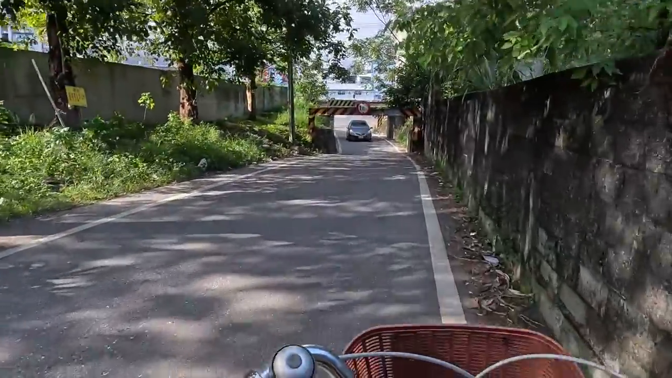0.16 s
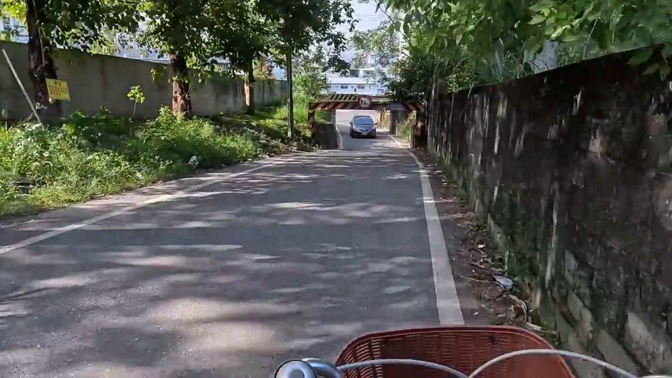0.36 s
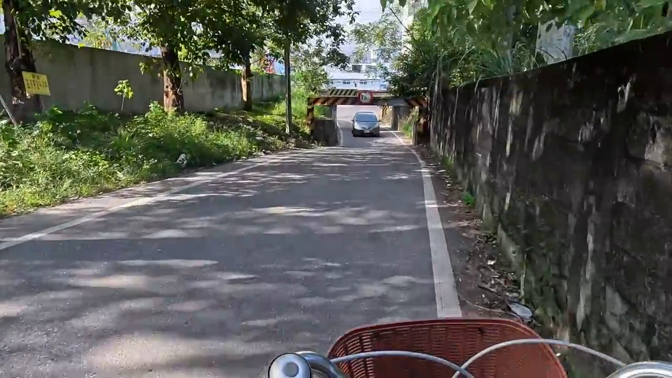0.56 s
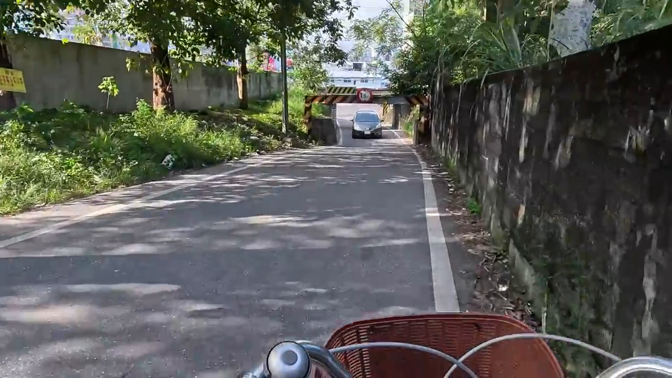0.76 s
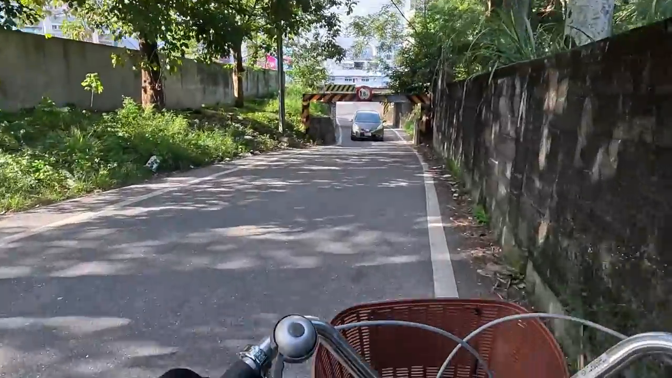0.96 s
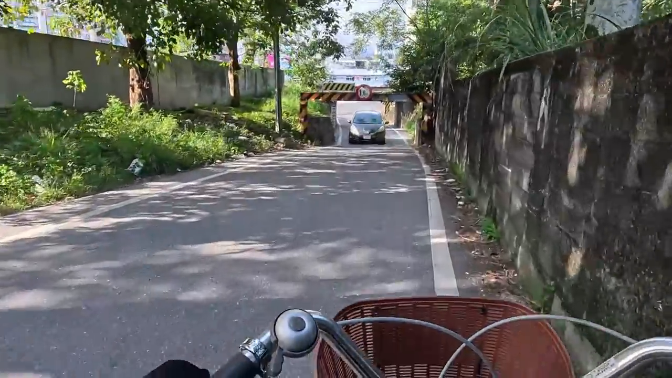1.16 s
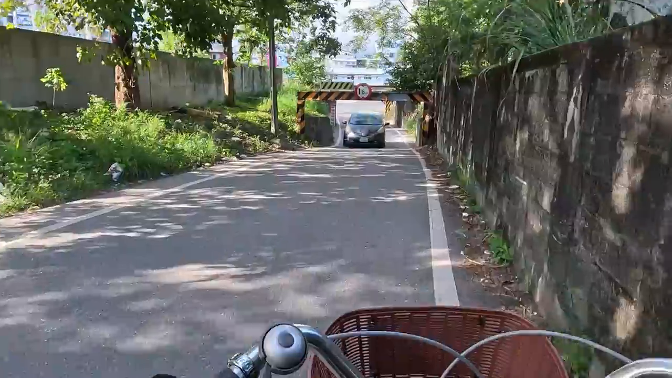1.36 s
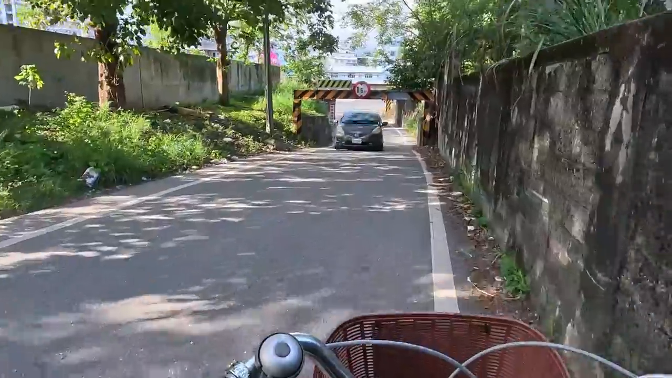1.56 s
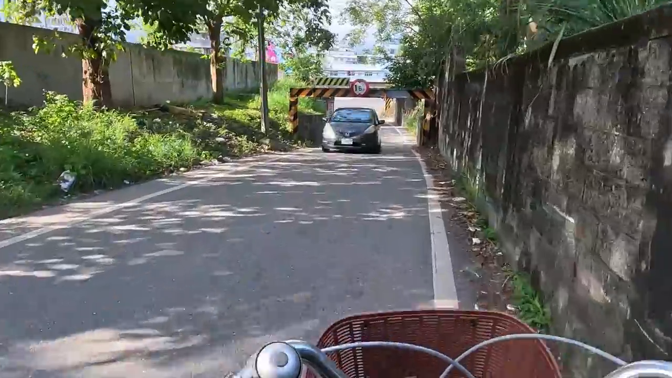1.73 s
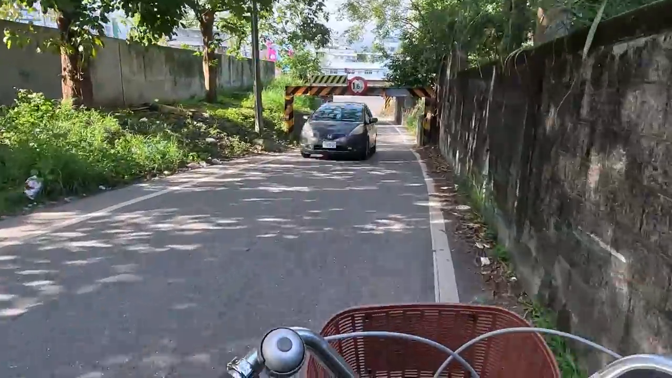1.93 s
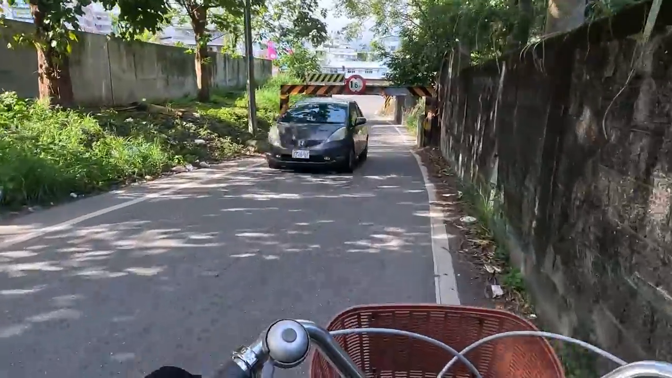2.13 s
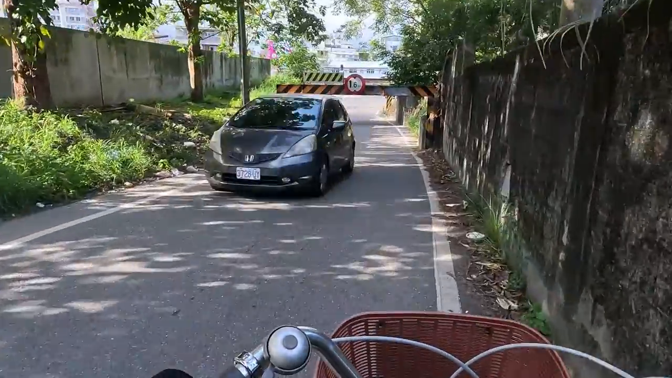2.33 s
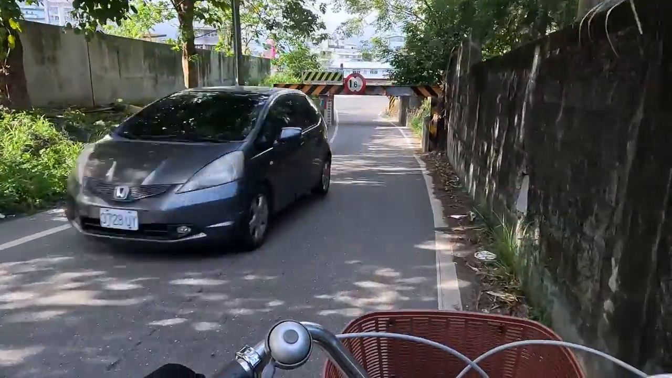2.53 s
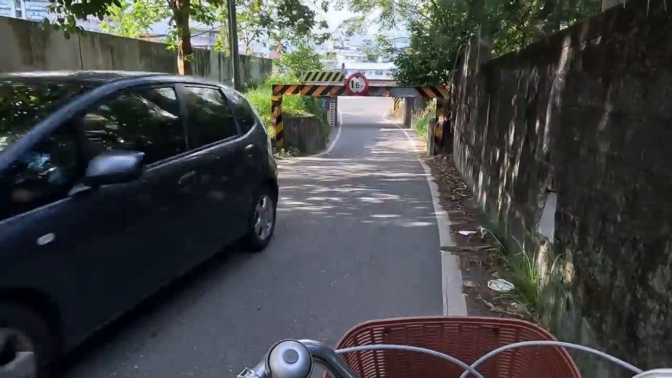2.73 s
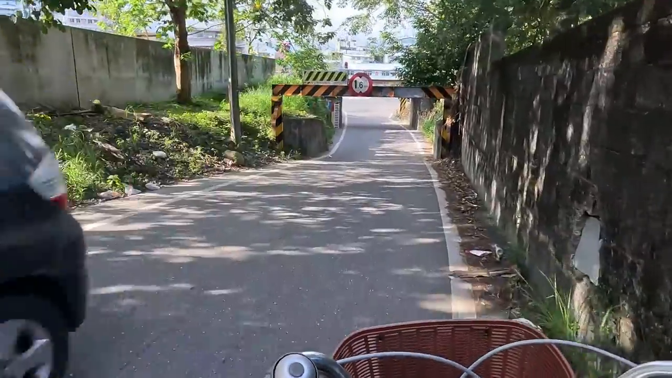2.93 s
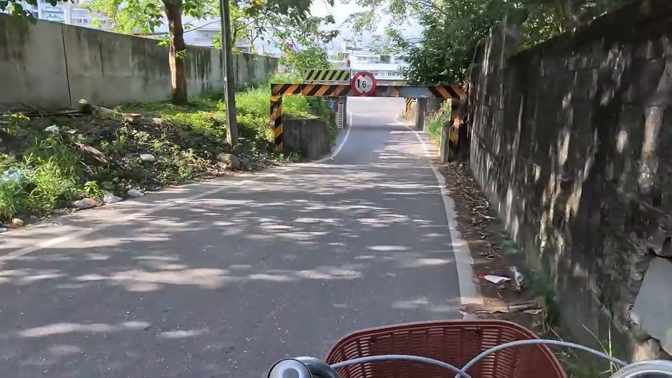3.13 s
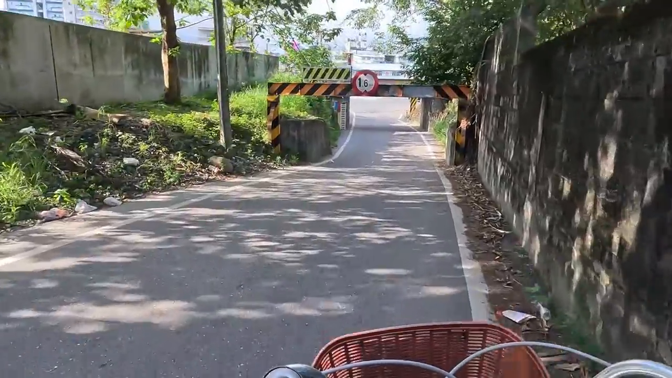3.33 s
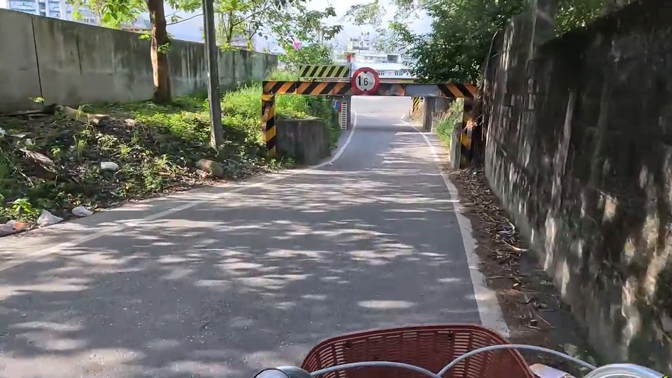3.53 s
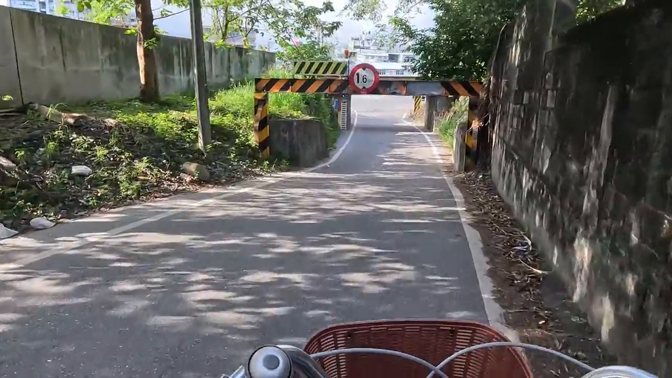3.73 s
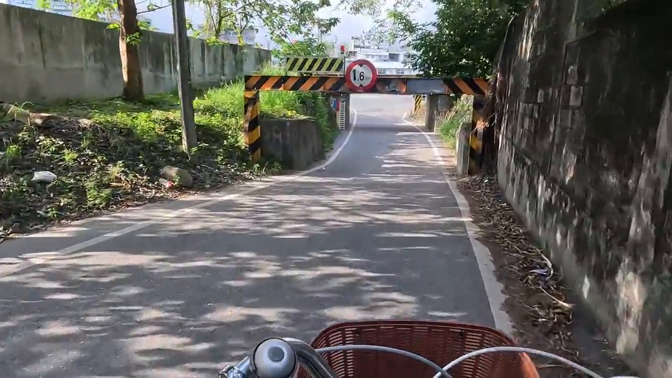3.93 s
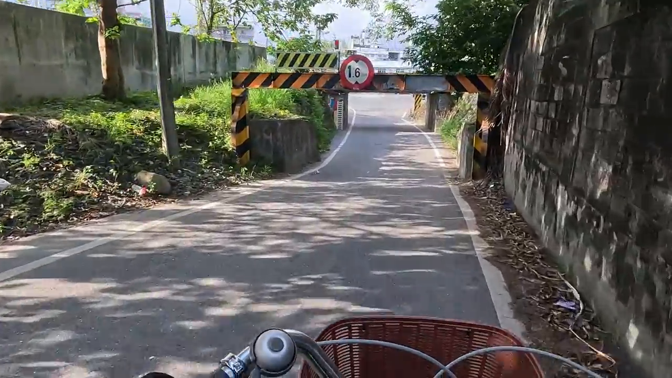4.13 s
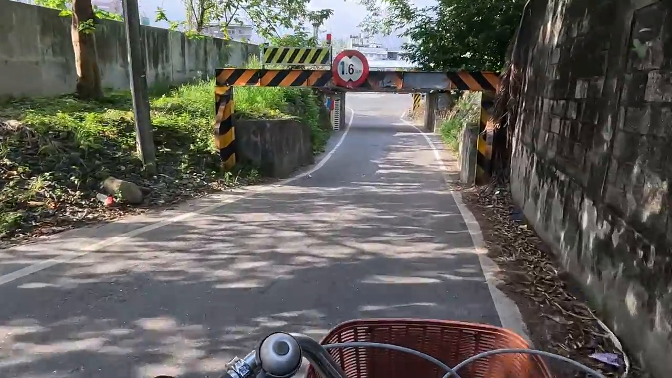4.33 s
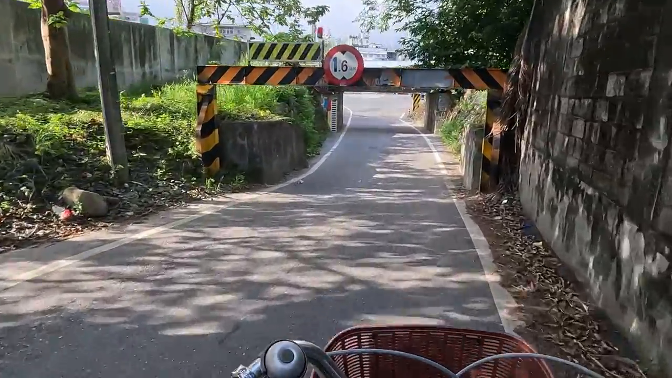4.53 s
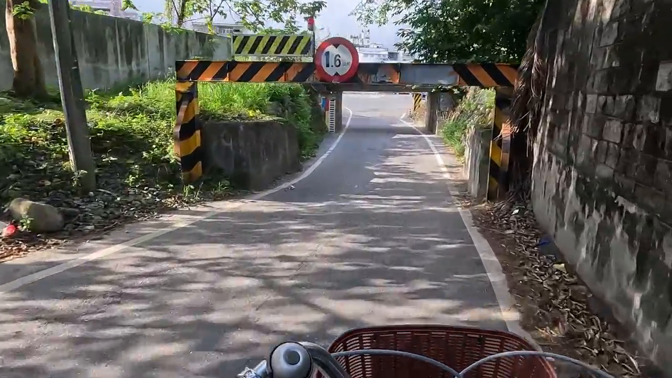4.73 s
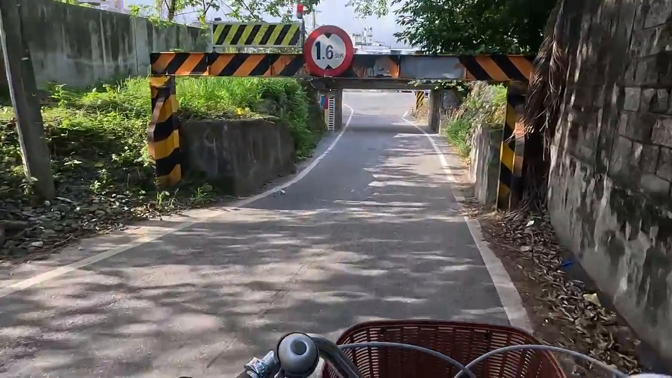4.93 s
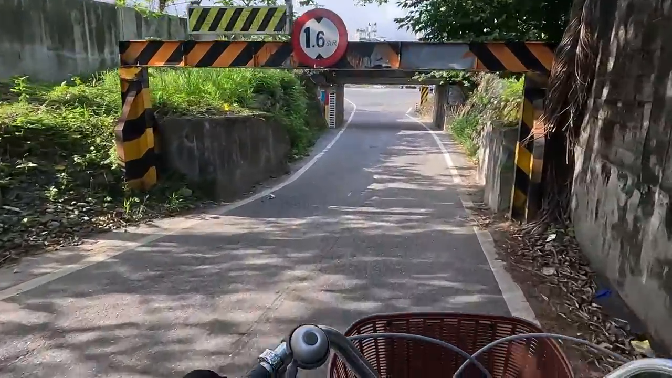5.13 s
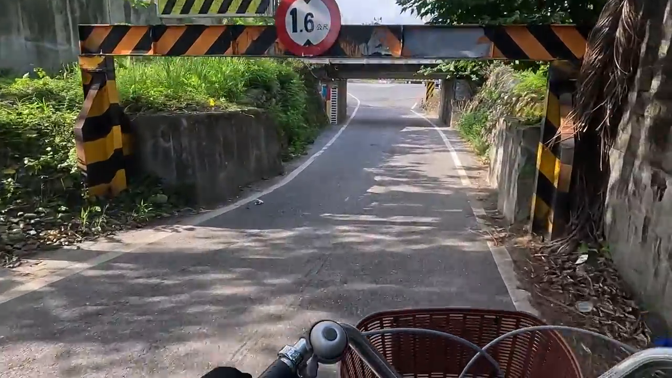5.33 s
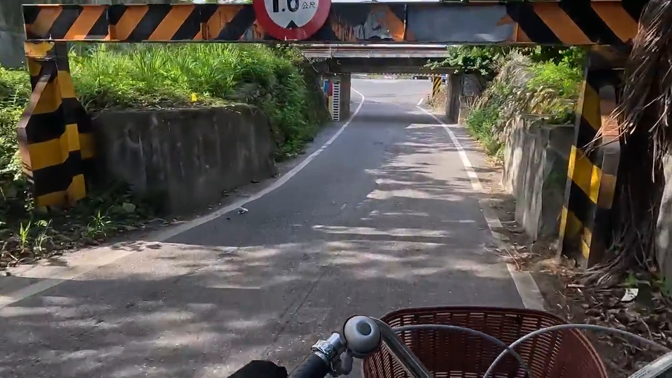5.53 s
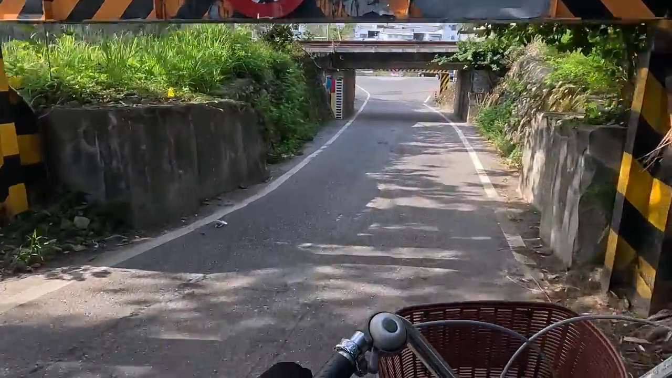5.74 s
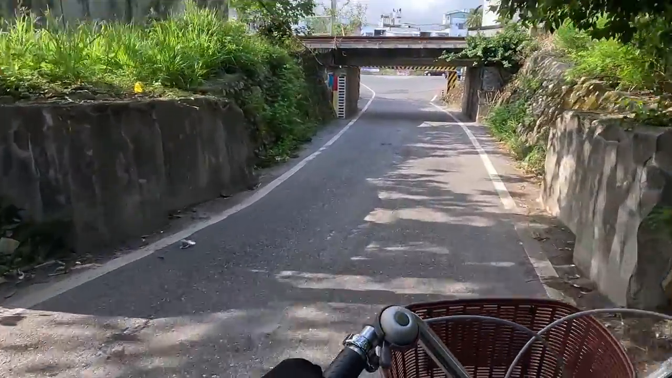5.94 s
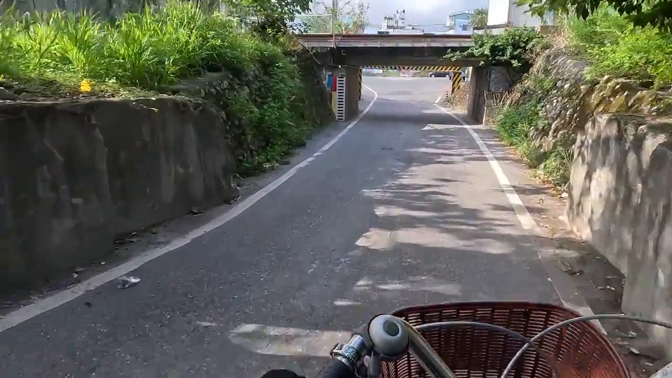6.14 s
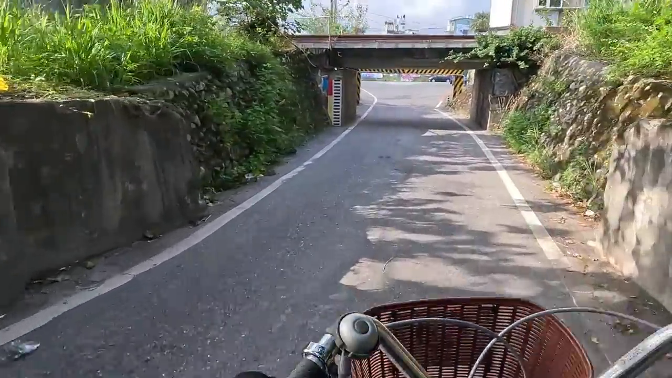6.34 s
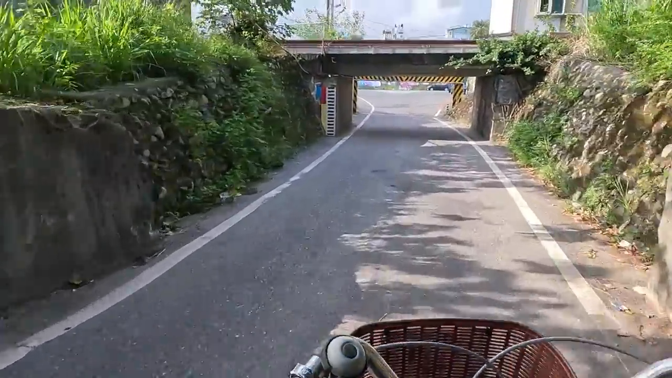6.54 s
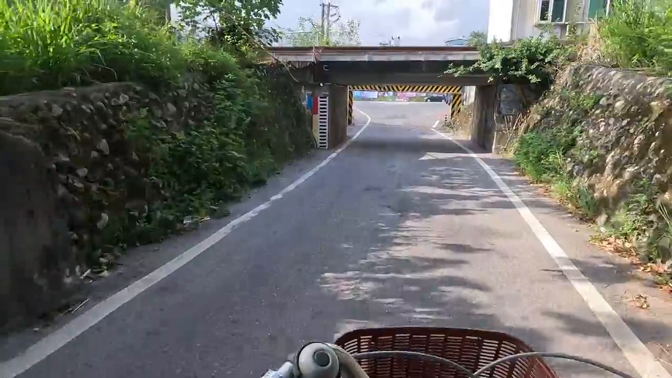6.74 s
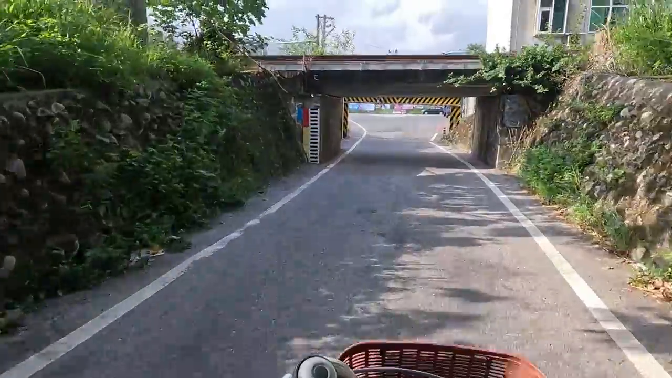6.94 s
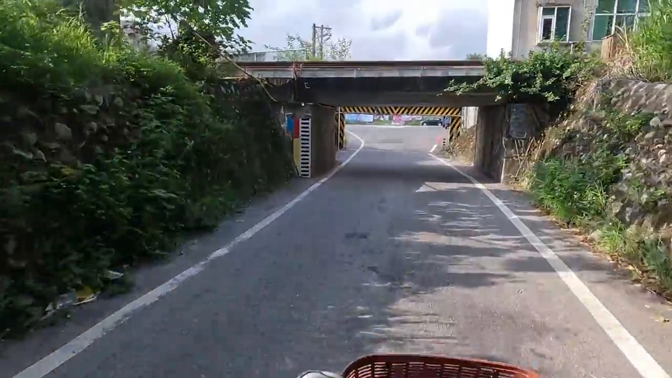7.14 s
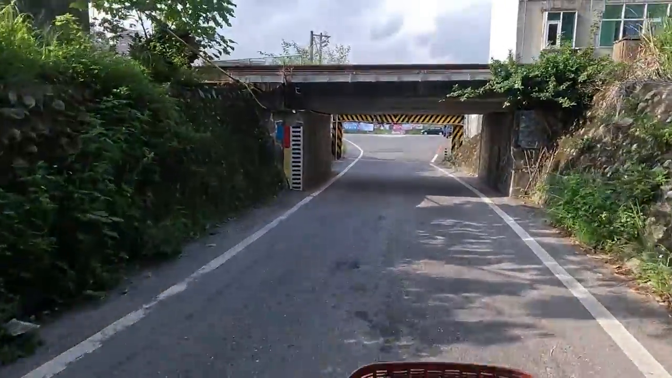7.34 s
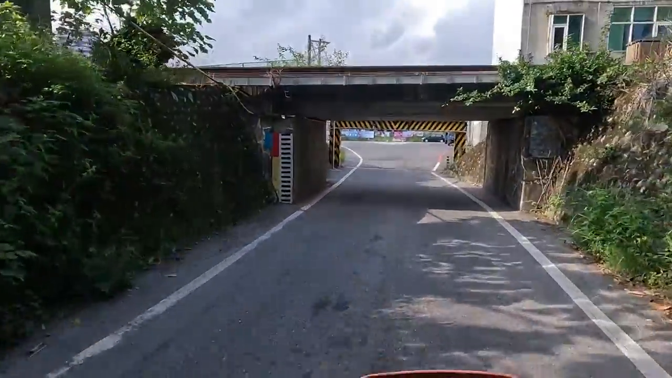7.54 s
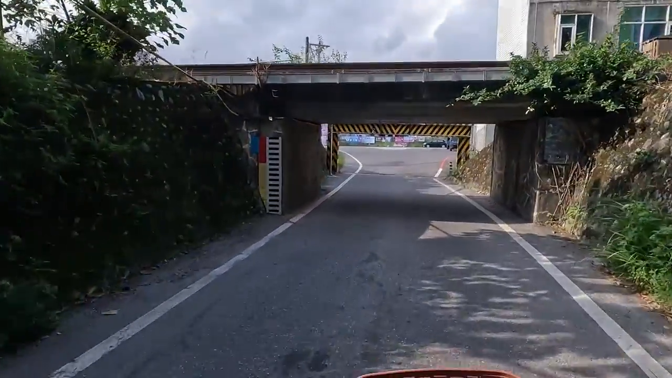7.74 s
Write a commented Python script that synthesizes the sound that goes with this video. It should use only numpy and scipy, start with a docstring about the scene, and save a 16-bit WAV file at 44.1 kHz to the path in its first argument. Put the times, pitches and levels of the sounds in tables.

```python
"""Tyre roar, rumble, wind and a distant engine's hum come first, at a bicycle rolling down a walled lane.
A microphone with two ports rides on the bicycle, towards an underpass; a small car passes close by.
Tyres, grit, wind and resonances are patchy noise in shaped bands; echoes off road and walls ripple some.
Exhaust, whine, tread note and hums are sums of wavering sines; the distant hum grows louder.
Freewheel clicks, litter crackles and knocks are short bursts, each with its own envelope."""
import sys
import numpy as np
from scipy import signal
from scipy.fft import rfft, irfft
from scipy.io import wavfile
from scipy.ndimage import uniform_filter1d

SR = 44100
rng = np.random.default_rng(int(sys.argv[2]) if len(sys.argv) > 2 else 0)


def pcm_store(signal):
    """Save signal as 16-bit PCM."""
    levels = np.round(np.clip(np.atleast_2d(signal), -1, 1) * 32767)
    wavfile.write(sys.argv[1], SR, levels.astype(np.int16).T)


N = 347933  # samples
TIME = np.arange(N) / SR  # seconds

# Reflection from the walls. Each row: time in seconds, delay in ms, strength as a share of the direct sound.
WALL_ECHO = [(3, 7.4, 0.03), (4, 6.9, 0.18), (5, 7.5, 0.18), (5.7, 8, 0.42), (6.35, 8.59, 0.29),
             (6.9, 10.15, 0.32), (7.89, 8.5, 0.33)]
# Reflection from the nearer wall. Each row: time in seconds, delay in ms, strength as a share.
NEAR_ECHO = [(3.9, 3.9, 0.17), (4.5, 4.25, 0.2), (5.1, 4.44, 0.34), (5.6, 5.3, 0.26), (5.85, 3.7, 0),
             (7.1, 4.7, 0), (7.5, 4.26, 0.33), (7.89, 4.6, 0.26)]


def gain_of(db):
    """Decibels to amplitude."""
    return 10 ** (np.asarray(db) / 20)


def evened(x):
    """Scales to rms 1."""
    return x / np.sqrt(np.mean(x ** 2) + 1e-20)


def read(points, hz):
    """Every column of a table over log frequency."""
    f, *columns = np.transpose(points)
    return [np.interp(np.log(hz + 1), np.log(f + 1), c) for c in columns]


def follow(rows, t):
    """Every column of a table over time."""
    s, *columns = np.transpose(rows)
    return [np.interp(t, s, c) for c in columns]


def level(rows):
    """Gain along a table of seconds and dB."""
    return gain_of(follow(rows, TIME)[0])


def together(*gains):
    """Unrelated sounds add by their power."""
    return np.sqrt(sum(g ** 2 for g in gains))


def swells(rows):
    """Gain of smooth swells, each with its own rise and fall."""
    gains = []
    for s, rise, fall, db in rows:
        width = np.where(TIME < s, rise, fall)
        gains.append(gain_of(db) * np.exp(-((TIME - s) / width) ** 2 / 2))
    return together(*gains)


def step(s, ramp_s):
    """Goes smoothly from 0 to 1 around time s."""
    return (1 + np.tanh((TIME - s) / ramp_s)) / 2


def present(rows):
    """Fades a source in and out over 1/20 s at the ends of its table."""
    return np.clip(np.minimum(TIME - rows[0][0], rows[-1][0] - TIME) * 20, 0, 1)


def drift(rate_hz):
    """Slow random wander of rms 1."""
    hz = np.fft.rfftfreq(N, 1 / SR)
    return evened(irfft(rfft(rng.standard_normal(N)) / (1 + (hz / rate_hz) ** 4), N))


def add(mix, s, sound):
    """Mixes a sound in at time s."""
    part = mix[round(s * SR):][:len(sound)]
    part += sound[:len(part)]


def wavering_phase(hz, waver, waver_hz):
    """Phase in radians of a pitch that wanders by the share waver (rms)."""
    return 2 * np.pi * np.cumsum(hz * (1 + waver * drift(rate_hz=waver_hz))) / SR


def tone(rows, waver, waver_hz):
    """A single wavering sine along a table of seconds, Hz and dB."""
    hz, db = follow(rows, TIME)
    return gain_of(db) * present(rows) * np.sin(wavering_phase(hz, waver, waver_hz))


def overtones(orders, phase):
    """Sum of sines at multiples of one phase, each starting anywhere in its cycle."""
    return sum(gain_of(db) * np.sin(round(k) * phase + 2 * np.pi * rng.random()) for k, db in orders)


def comb(echo, t, hz, fade_hz=1150):
    """Ripple that a moving reflection leaves in the spectrum; rough surfaces scatter the higher notes."""
    delay_ms, strength = follow(echo, t)
    back = strength[:, None] / (1 + (hz / fade_hz) ** 4)
    turn = np.exp(-2j * np.pi * np.outer(delay_ms, hz) / 1000)
    return abs(1 + back * turn) / np.sqrt(1 + back ** 2)


def rush(colour, gain, patchy_db, upper_gain=None, split_hz=None, echoes=(), doppler=None, size=1024):
    """Patchy turbulent noise at both ports; the part above split_hz may follow a gain of its own."""
    # The microphone's two ports. Each row: frequency in Hz, left minus right in dB, left lead in radians,
    # share unrelated between them in dB.
    ports = [(100, -0.5, 0.25, -19), (300, 1.2, 0.01, -18.5), (700, 3, 0.4, -18.5), (1150, 2, 0.49, -14),
             (1550, -1.5, 1, -10), (1900, 2.5, 0.74, -4), (2280, 1, -1.2, 0), (2670, 5.5, -2.5, -3),
             (3200, 10.5, -1, -11), (3570, 10, -2, -9), (4300, 5.5, 2, -2.5), (5100, 0, -0.57, -13.5),
             (8160, 0, 0, -19), (9730, 3, 1.5, -3)]
    hop = size // 4
    hz, t = np.fft.rfftfreq(size, 1 / SR), np.arange(N // hop + 5) * hop / SR
    in_band = (hz < 1.5 * colour[-1][0]) * (hz > colour[0][0] / 2)
    shape = gain_of(read(colour, hz)[0]) * in_band
    shape = shape / np.linalg.norm(shape)
    if doppler:
        shape = np.interp(hz / follow(doppler, t)[0][:, None], hz, shape)
    gain = np.interp(t, TIME, gain)[:, None]
    if split_hz:
        lower = 1 / (1 + (hz / split_hz) ** 10)
        # each part is scaled so that its own gain sets its power
        low, high = (np.sqrt(part / (part @ shape ** 2)) for part in (lower, 1 - lower))
        gain = together(gain * low, np.interp(t, TIME, upper_gain)[:, None] * high)
    for echo in echoes:
        shape = shape * comb(echo, t, hz)

    a, b, c, d, patches = rng.standard_normal((len(t), len(hz), 5)).T.swapaxes(1, 2)
    shared, unrelated = a + 1j * b, c + 1j * d
    patches = uniform_filter1d(patches, size=6, axis=0)
    patches = evened(uniform_filter1d(patches, size=12, axis=1))

    # the right port hears a shifted, partly unrelated copy; their middle keeps the level
    balance_db, lead, apart_db = read(ports, hz)
    same = np.sqrt(1 - np.minimum(gain_of(apart_db), 1) ** 2)
    left, right = gain_of(balance_db / 2), gain_of(-balance_db / 2)
    centre = np.sqrt(left ** 2 + right ** 2 + 2 * same * np.cos(lead)) / 2
    other = (same * shared + np.sqrt(1 - same ** 2) * unrelated) * np.exp(-1j * lead)
    frames = np.array([left * shared, right * other]) / centre
    frames = frames * shape * gain * gain_of(patchy_db * patches)
    sound = signal.istft(frames.swapaxes(1, 2), nperseg=size, noverlap=size - hop)[1][:, :N]
    return sound * np.sqrt(3 / 2)  # makes up for the power lost as unrelated frames overlap


def pass_by(nearest_s, peak_db, spread, behind_db_per_s):
    """Gain of the passing car: it falls with distance to the power spread, and faster once the car is behind."""
    closing_m_per_s, gap_m = 8.3, 2.36  # car and bicycle together; their distance as they meet
    distance = np.hypot(closing_m_per_s * (TIME - nearest_s), gap_m)
    behind_db = behind_db_per_s * np.maximum(TIME - nearest_s, 0)
    return gain_of(peak_db - behind_db) * (gap_m / distance) ** spread


def lane(steady_db, swell_db):
    """Gain of the road noise that fills the lane with or without the car."""
    # Swells of the road noise. Each row: peak in seconds, rise and fall in seconds, level in dB above swell_db.
    road_swells = [(5.11, 0.25, 0.11, -0.5), (6.36, 0.26, 0.2, 0.5), (6.62, 0.12, 0.056, -2)]
    return together(gain_of(steady_db), gain_of(swell_db) * swells(road_swells))


def tread_roar():
    """The roar of tread blocks on asphalt, from the car until it is gone and from the traffic beyond."""
    # Roar of the traffic beyond, then the car's narrower one. Each row: Hz, relative density in dB per Hz.
    roar_colour = [(780, -27), (850, -17), (900, -5), (980, -3), (1060, -3), (1160, 0), (1250, -2.5),
                   (1370, -7.5), (1490, -25), (1700, -43)]
    car_colour = [(780, -25), (860, -14.5), (920, -6.5), (990, -3), (1060, -2.5), (1160, 1), (1240, -1.5),
                  (1340, -4), (1430, -11.5), (1520, -25.5), (1700, -38)]
    # Pitch of the car's roar, sharp at first and then either side of true. Each row: seconds, pitch factor.
    pitch_shift = [(0, 1.073), (1.2, 1.014), (2.4, 0.99), (2.85, 1.012), (3.1, 0.97), (4.5, 1.03)]
    # The car's roar, beamed ahead of its tyres. Each row: seconds, level in dB before the closing fade.
    car_roar = [(0, -37), (.6, -30.5), (1.15, -35), (1.47, -31), (1.62, -26), (2.25, -23), (2.42, -24),
                (2.62, -22), (3.12, -25), (3.3, -29.5), (3.6, -34.5), (4.4, -36)]
    car_gain = level(car_roar) * (1 - step(car_roar[-1][0], ramp_s=0.23))
    car = rush(car_colour, car_gain, patchy_db=0.55, doppler=pitch_shift, size=2048)
    lane_gain = lane(steady_db=-35, swell_db=-31.5)
    beyond = rush(roar_colour, lane_gain, patchy_db=0.5, echoes=(WALL_ECHO, NEAR_ECHO), size=2048)
    return car + beyond


def tread_hiss():
    """Air hissing out of the treads, loudest as the car goes by and brighter towards the underpass."""
    # Spectrum of the hiss. Each row: frequency in Hz, relative density in dB per Hz.
    hiss_colour = [(1350, -6), (1520, -2.5), (1700, 0.5), (1950, 2), (2100, -2.5), (2450, -18), (2850, -8),
                   (3200, -9), (3550, -17.5), (3950, -18.5), (4500, -28.5), (5200, -40)]
    # A brief swell of the lower hiss at the height barrier, then swells of the upper hiss near the underpass.
    # Each row: peak in seconds, rise and fall in seconds, level in dB.
    barrier_hiss = [(5.12, 0.05, 0.082, -45.5)]
    upper_hiss = [(6.78, .08, 0.074, -52.5), (7.18, 0.088, .05, -49), (7.85, .17, .2, -53)]
    near = step(6.25, ramp_s=0.45)  # the underpass comes near
    low = together(pass_by(nearest_s=2.93, peak_db=-35.5, spread=0.99, behind_db_per_s=11.0),
                   lane(steady_db=-51.0 + 2.8 * near, swell_db=-52.5),
                   swells(barrier_hiss))
    high = together(pass_by(nearest_s=2.85, peak_db=-44.0, spread=0.81, behind_db_per_s=6.0),
                    lane(steady_db=-56.0 + 5.1 * near, swell_db=-67.0),
                    swells(upper_hiss))
    return rush(hiss_colour, low, patchy_db=1.14, upper_gain=high, split_hz=2520)


def tread_note():
    """The rough note of the tread blocks striking the road, a little to the left."""
    # The note within the roar, clearest just after the car has passed.
    # Each row: seconds, pitch in Hz before its waver, level in dB before flutter and balance.
    note_path = [(0, 1165, -39), (.6, 1198, -33.5), (1.05, 1135, -44), (1.2, 1130, -31), (1.42, 1118, -35),
                 (1.65, 1157, -32), (2.25, 1175, -28.5), (2.83, 1179, -26), (3.02, 1265, -26),
                 (3.11, 1203, -21), (3.17, 1195, -34), (3.4, 1185, -32.5), (3.55, 1175, -49)]
    flutter = 1 + 0.4 * drift(rate_hz=55)
    balance = gain_of([[1], [-1]])  # dB, left and right
    return tone(note_path, waver=0.01102, waver_hz=40.3) * flutter * balance


def opening():
    """Gain of the rumble, which starts 4.5 dB down and comes up quickly."""
    return gain_of(-4.5 * np.exp(-(TIME / 0.18) ** 2))


def road_rumble():
    """The low body of the tyre noise, carried far by the walls and rippled by their echoes."""
    # Spectrum of the rumble. Each row: frequency in Hz, relative density in dB per Hz.
    rumble_colour = [(110, -11), (155, -2.5), (205, 0), (245, 0), (305, 1.9), (400, -1), (455, -4.5),
                     (530, -3), (660, -4), (750, -6), (840, -9), (1000, -21)]
    # The road's reflection of the car, latest soon after they meet. Each row: seconds, delay in ms, strength.
    ground_echo = [(0, 0.79, 0.5), (1, 0.57, 0.23), (1.8, 0.55, 0.16), (2.2, 0.97, 0.33), (2.5, 1.37, 0.28),
                   (2.72, 2.75, 0.093), (3.1, 3.6, 0.15), (3.5, 2.4, 0.045)]
    # Low swell as the car comes through the narrow cutting.
    # Each row: peak in seconds, rise and fall in seconds, level in dB.
    car_in_cutting = [(1.7, 0.43, 0.75, -34)]
    walled = step(5.6, ramp_s=0.12)  # the walls close in on the bicycle and hold the low road noise
    low = together(pass_by(nearest_s=3.02, peak_db=-31.5, spread=0.89, behind_db_per_s=15.5),
                   lane(steady_db=-38.5 + 3.5 * walled, swell_db=-34.5),
                   swells(car_in_cutting))
    high = together(pass_by(nearest_s=2.75, peak_db=-28, spread=0.58, behind_db_per_s=12.0),
                    lane(steady_db=-40.0 + 3.86 * walled, swell_db=-34.5))
    echoes = (ground_echo, WALL_ECHO, NEAR_ECHO)
    rumble = rush(rumble_colour, low, patchy_db=0.84, upper_gain=high, split_hz=430, echoes=echoes, size=4096)
    return rumble * opening()


def tyres():
    """Tread roar, hiss, note and road rumble; the coarse asphalt makes roar and hiss flutter."""
    flutter = gain_of(0.24 * drift(rate_hz=51))
    return (tread_roar() + tread_hiss()) * flutter + tread_note() + road_rumble()


def far_engine():
    """A slowly sagging hum; reflections in the lane make its fundamental dip and its octave swell."""
    # The distant engine's pitch. Each row: seconds, firing rate in Hz.
    hum_pitch = [(0, 134.8), (2, 133.9), (3.6, 132.3), (4.75, 132.7), (6, 130.4), (7.15, 128),
                 (7.89, 126.7)]
    # Its partials. Each row: multiple of the firing rate, level in dB relative to the hum level.
    hum_orders = [(1, -3), (3, -30)]
    # Its level before dips and partials. Each row: seconds, level in dB.
    hum_level = [(0, -36.5), (.8, -31.5), (1.5, -37.5), (2.05, -30), (2.7, -30.5), (3.55, -29),
                 (4.25, -27.5), (5.4, -22.5), (5.7, -24), (6.0, -15.5), (6.17, -20), (6.45, -18.5),
                 (6.7, -21.5), (7.2, -20), (7.89, -21.5)]
    # Where reflections cancel it. Each row: centre in seconds, half width in seconds, depth in dB.
    hum_dips = [(.12, .06, 9), (.53, 0.14, 13.5), (1.25, 0.046, 10), (1.72, 0.11, 17), (2.37, 0.12, 13),
                (3.15, 0.18, 18), (3.9, 0.13, 9.5), (4.49, 0.086, 8.5), (4.91, 0.036, 6), (5.16, 0.15, 15),
                (6.92, 0.053, 12), (7.35, 0.075, 5.5), (7.73, 0.061, 12)]
    # Swells of its octave. Each row: peak in seconds, rise and fall in seconds, level in dB.
    octave_swells = [(1.74, .14, 0.36, -36.5), (3.3, 0.11, 0.085, -35.5), (4.25, .2, .2, -44),
                     (5.03, 0.26, 0.224, -31), (7.54, 0.091, 0.052, -34)]
    hz, = follow(hum_pitch, TIME)
    phase = wavering_phase(hz, waver=0.0036, waver_hz=5.7)
    dips = gain_of(-sum(db * np.exp(-((TIME - s) / width) ** 2) for s, width, db in hum_dips))
    note = overtones(hum_orders, phase) * (1 + 0.066 * drift(rate_hz=6.4))
    octave = np.sin(2 * phase + 0.45 * drift(rate_hz=5.3)) * (1 + 0.33 * drift(rate_hz=31))
    between_swells = gain_of(-45.5 + 3.1 * drift(rate_hz=2.6))
    return level(hum_level) * dips * note + together(between_swells, swells(octave_swells)) * octave


def wind():
    """Low turbulence in gusts, with single eddies that push and then pull on the microphone."""
    # Spectrum of the wind. Each row: frequency in Hz, relative density in dB per Hz.
    wind_colour = [(10, -13), (22, -1.5), (33, 0.5), (50, -1), (75, -5.5), (105, -6.5), (150, -12),
                   (230, -20.5), (500, -43)]
    # Gusts on the microphone. Each row: peak in seconds, rise and fall in seconds, level in dB.
    gusts = [(1.1, .35, 0.35, -39.5), (3.1, 0.084, .22, -31.5), (4.74, 0.13, 0.22, -25.5),
             (5.06, 0.038, 0.054, -29), (5.82, 0.12, .4, -35), (6.68, 0.07, 0.2, -26),
             (7.4, 0.5, 0.97, -32)]
    # Eddies that hit it. Each row: centre in seconds, peak in dB, rate of the push and pull in Hz.
    buffets = [(4.617, -18.5, 30), (4.708, -18, 26), (4.771, -11, 42.4), (4.798, -18, 30), (4.822, -18, 50),
               (4.941, -18, 95), (4.96, -21, 31.9), (5.039, -15.5, 48), (5.076, -23, 48), (5.099, -25, 60),
               (5.712, -22.5, 40), (6.629, -17, 26), (6.66, -17, 75), (6.678, -15.5, 110),
               (6.711, -18.5, 52), (6.743, -20, 65), (6.795, -20, 42), (6.832, -21, 48)]
    eddies, t = np.zeros(N), np.arange(-SR // 20, SR // 20) / SR
    for s, db, hz in buffets:
        u = 2 * np.pi * hz * t
        add(eddies, s + t[0], -gain_of(db) * u * np.exp((1 - u ** 2) / 2))
    breeze = gain_of(-36.5)  # between the gusts
    return rush(wind_colour, together(breeze, swells(gusts)), patchy_db=1.5, size=4096) + eddies


def underpass():
    """Tyre noise caught in a low and a high resonance of the concrete passage."""
    # The low and the high resonance. Each row: frequency in Hz, relative density in dB per Hz.
    boom_colour = [(420, -18), (490, -5.5), (530, 1.5), (575, -6), (640, -25)]
    ring_colour = [(1350, -12), (1550, -2), (1700, -8.5), (1900, -24.5)]
    # Their levels, with the car in the passage and just out of it. Each row: seconds, level in dB.
    boom_level = [(0, -47), (.4, -38.5), (.8, -41.5), (1.3, -41), (1.8, -42), (2.25, -39), (2.52, -33),
                  (2.75, -42), (3.1, -35.5), (3.5, -54)]
    ring_level = [(0, -53), (.85, -51), (1, -42), (1.45, -42), (1.7, -47)]
    boom = rush(boom_colour, level(boom_level), patchy_db=1.5, size=2048)
    return boom + rush(ring_colour, level(ring_level), patchy_db=1.0)


def grit():
    """A thin sizzle of sand and dust under the wheels of car and bicycle, with a spray as the car draws level."""
    # Spectrum of the grit. Each row: frequency in Hz, relative density in dB per Hz.
    grit_colour = [(3700, -9), (4600, -5.5), (5200, -3), (5800, -2.5), (6500, -4.3), (7400, -4.5),
                   (8400, -12), (9300, -17), (10200, -24), (12100, -27), (14000, -41)]
    # Grit thrown up by the car and in its wake, then patches of sand under the bicycle (before flicker).
    # Each row: peak in seconds, rise and fall in seconds, level in dB.
    spray = [(2.75, .07, 0.11, -58), (3.15, .12, .17, -60.5)]
    sand = [(1.42, 0.49, 0.42, -60), (6.95, 0.68, 0.6, -62.5), (7.18, 0.083, 0.093, -58.5)]
    car = together(pass_by(nearest_s=2.73, peak_db=-53.5, spread=0.92, behind_db_per_s=4.5), swells(spray))
    flicker = gain_of(0.95 * drift(rate_hz=7.9))
    bicycle = together(gain_of(-65.5), swells(sand)) * flicker
    return rush(grit_colour, together(car, bicycle), patchy_db=2.0, size=512)


def freewheel():
    """The pawl drops into each tooth of the ratchet and rings for a moment; click strengths vary."""
    # The bicycle coasts downhill and gathers speed. Each row: seconds, clicks per second.
    pawl_rate = [(0, 20.5), (.4, 22), (.8, 27), (3.9, 27.7), (4.6, 28.5), (5.3, 32.2), (5.9, 33.3),
                 (7.89, 40.2)]
    # Spectrum of a click. Each row: frequency in Hz, relative density in dB per Hz.
    pawl_colour = [(2500, -22), (2900, 1), (3300, -2), (3950, -3.5), (4600, -13.5), (5600, -12.5),
                   (7400, -17), (9000, -30), (12000, -37.5)]
    click_db, uneven_db, ring_s = -57.5, 1.5, .002
    teeth = np.floor(np.cumsum(follow(pawl_rate, TIME)[0]) / SR)
    strength = gain_of(click_db + uneven_db * np.clip(rng.standard_normal(N), -2, 2))
    clicks = np.diff(teeth, prepend=0) * strength
    u = np.arange(SR // 40) / SR / ring_s
    envelope = signal.oaconvolve(clicks, u * np.exp(1 - u))[:N]
    return rush(pawl_colour, np.ones(N), patchy_db=1.5, size=512) * envelope


def crackles(size=8192):
    """Dry litter and ticks of the bicycle: short noise bursts, each with its own brightness and decay."""
    # Each row: start in seconds, level in dB before the envelope, centre in Hz, width in octaves,
    # decay in seconds.
    bursts = [(0.28, -47, 3400, 0.44, .004), (1.194, -43, 3200, 0.17, .003), (1.293, -46, 6740, 0.2, .018),
              (1.318, -51, 6600, .3, 0.035), (1.354, -51, 6960, 0.26, 0.013), (2.001, -37, 3150, .2, .003),
              (3.867, -47.5, 3200, 0.31, 0.0036), (5.221, -46, 3200, 0.26, 0.0031),
              (5.623, -48, 3300, 0.24, .003), (6.05, -40, 2980, 0.48, 0.0035),
              (6.059, -51, 4800, 0.51, 0.01), (6.082, -51, 6800, 0.19, 0.0039)]
    attack_cycles = 3.5  # a crackle builds up over a few cycles
    out, t, hz = np.zeros(N), np.arange(size) / SR, np.fft.rfftfreq(size, 1 / SR)
    for s, db, centre_hz, width, decay in bursts:
        band = np.exp(-(np.log2((hz + 1) / centre_hz) / width) ** 2 / 2)
        burst = evened(irfft(rfft(rng.standard_normal(size)) * band))
        envelope = np.exp(-t / decay) * (1 - np.exp(-t * centre_hz / attack_cycles))
        add(out, s, gain_of(db) * burst * envelope)
    return out


def fine_sand():
    """Short, bright sprinkles of the finest sand against the bicycle's tyres and mudguards."""
    # Spectrum of the sprinkles. Each row: frequency in Hz, relative density in dB per Hz.
    sand_colour = [(6500, -11), (8000, 1), (10000, -2), (11000, -8), (12200, -5), (13800, -21)]
    # Their swells. Each row: peak in seconds, rise and fall in seconds, level in dB before flicker.
    sprinkles = [(1.32, .035, .035, -66), (1.585, .055, .022, -66), (6.58, .04, .07, -73),
                 (7.18, .15, .25, -71)]
    flicker = gain_of(2 * drift(rate_hz=30))
    return rush(sand_colour, swells(sprinkles) * flicker, patchy_db=1.0, size=512)


def car_engine():
    """Firing pulses through the silencer, rocked by uneven cylinders, and the whine of the belt drive."""
    # Fundamental of the exhaust, before its nodes. Each row: seconds, level in dB.
    exhaust = [(1.42, -33), (1.55, -25.5), (1.8, -26.5), (2.7, -20), (3.4, -19), (3.85, -19), (4.2, -22.5),
               (4.5, -24.5), (4.66, -31)]
    # The engine slows overall. Each row: seconds, firing rate in Hz.
    exhaust_pitch = [(1.4, 58.6), (1.8, 59.7), (2.0, 55.66), (2.4, 52.63), (3.3, 52.1), (4.2, 52.37),
                     (4.7, 53.2)]
    # Its overtones. Each row: multiple of the firing rate, level in dB relative to the burr level.
    exhaust_orders = [(2, -1.5), (3, -1), (4, -9)]
    # The overtones carry on while the fundamental fades in and out. Each row: seconds, level in dB.
    burr_level = [(1.4, -58), (2, -42.5), (2.5, -35), (3.1, -37), (3.7, -37.5), (4.7, -53)]
    # Whine of the belt drive, falling as the car passes. Each row: seconds, pitch in Hz, level in dB.
    whine = [(1.7, 364, -46), (2.3, 370, -46.5), (2.52, 368, -50), (2.57, 365, -33), (2.67, 362, -33),
             (2.705, 361, -24), (2.82, 360.5, -27.5), (2.87, 355, -35)]
    hz, = follow(exhaust_pitch, TIME)
    phase = wavering_phase(hz, waver=0.0041, waver_hz=10.7)
    uneven = 1 + 0.12 * np.sin(phase / 4)  # one round of the four cylinders
    # the fundamental stands between the walls: the microphone crosses a quiet node every 1.35 s
    standing = together(np.sin(np.pi * (TIME - 2.69) / 1.35), gain_of(-20))
    fundamental = level(exhaust) * standing * np.sin(phase)
    burr = level(burr_level) * overtones(exhaust_orders, phase) * (1 + .3 * drift(rate_hz=11))
    return (fundamental + burr) * uneven * present(exhaust) + tone(whine, waver=.002, waver_hz=12)


def faint_hum():
    """A second, fainter hum from the traffic beyond, as one wavering sine."""
    # Each row: seconds, pitch in Hz, level in dB.
    hum_path = [(2.7, 174, -50), (3.3, 172.5, -39.5), (3.65, 172, -39), (4.0, 171.8, -44), (4.7, 171, -41)]
    return tone(hum_path, waver=0.0032, waver_hz=6.4)


def cutting():
    """Road noise caught between the close walls, which colour it with a hollow note."""
    # The hollow note and its octave. Each row: frequency in Hz, relative density in dB per Hz.
    hollow_colour = [(310, -19.5), (345, 0), (370, 2.5), (398, -4.5), (440, -18), (570, -19), (640, -8),
                     (685, -4), (760, -20)]
    # Its swells. Each row: peak in seconds, rise and fall in seconds, level in dB.
    hollow = [(5.1, .13, 0.12, -32.5), (6.25, 0.55, 0.3, -34.5), (7.55, 0.2, 0.27, -38)]
    # It sinks as the walls part and rises as they close in again. Each row: seconds, pitch factor.
    hollow_pitch = [(5.1, 1.08), (5.6, 1.025), (6.3, 0.95), (6.85, 0.86), (7.2, 1.08), (7.55, 1.05)]
    return rush(hollow_colour, swells(hollow), patchy_db=1.0, doppler=hollow_pitch, size=4096)


def knocks():
    """A loose part of the bicycle knocks and rebounds, ringing crisply for only a few cycles."""
    # Each row: start in seconds, peak of the envelope in dB, pitch in Hz.
    hits = [(6.003, -26.5, 1780), (6.025, -40, 1850)]
    out, t = np.zeros(N), np.arange(SR // 30) / SR
    u = t / 0.0018  # the rise, in seconds
    for s, db, hz in hits:
        add(out, s, gain_of(db) * (u * np.exp(1 - u)) ** 2 * np.sin(2 * np.pi * hz * t))
    return out


def scene():
    """Everything in the lane, as the two ports pick it up; the engines lean a little to the right."""
    engines = (far_engine() + car_engine() + faint_hum()) * gain_of([[-.25], [.25]])
    road = tyres() + underpass() + grit() + fine_sand() + cutting()
    return road + engines + wind() + freewheel() + crackles() + knocks()


def record(dry):
    """The band limit behind the microphone: a steep low-pass at 14.1 kHz."""
    low_pass = signal.firwin(511, 14100, window=("kaiser", 9), fs=SR)
    return signal.oaconvolve(dry, low_pass[None], "same")


dry = scene()
out = record(dry)
pcm_store(out)
```